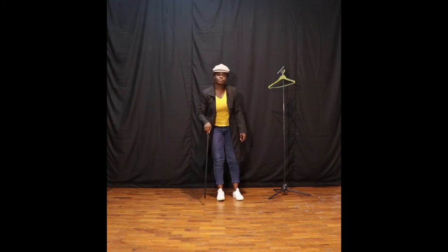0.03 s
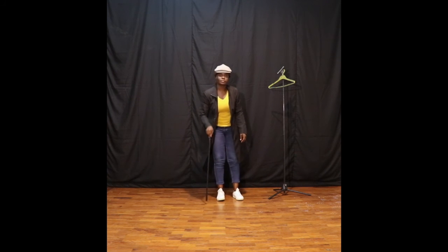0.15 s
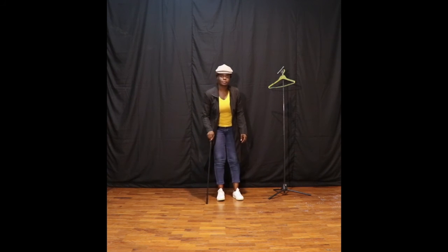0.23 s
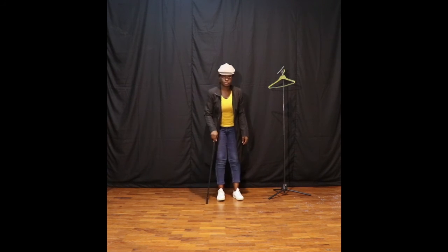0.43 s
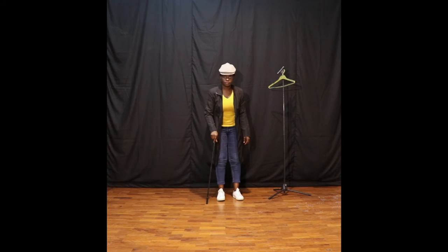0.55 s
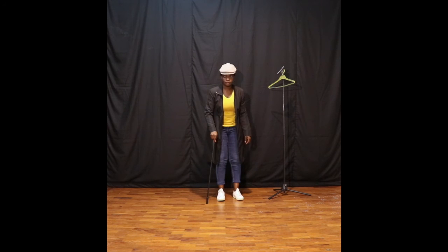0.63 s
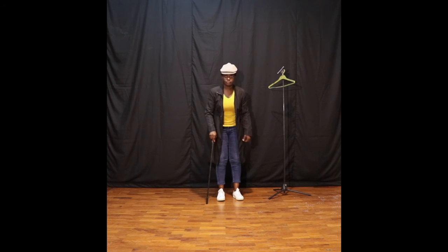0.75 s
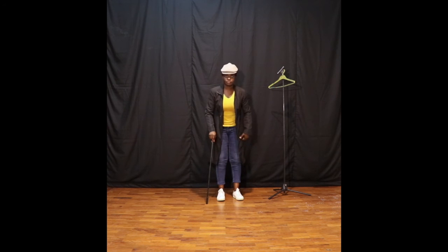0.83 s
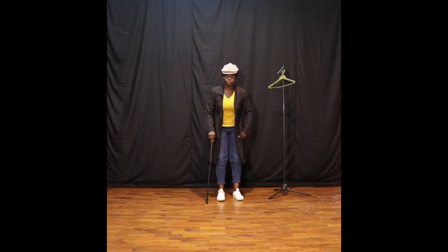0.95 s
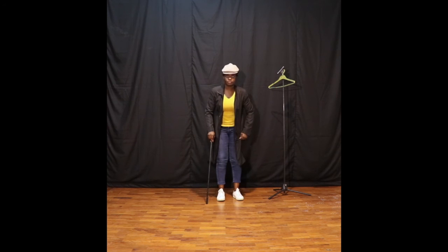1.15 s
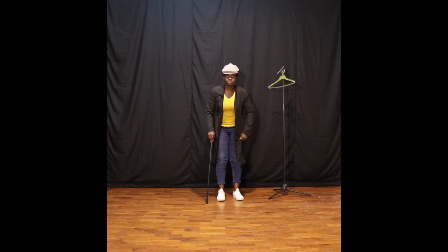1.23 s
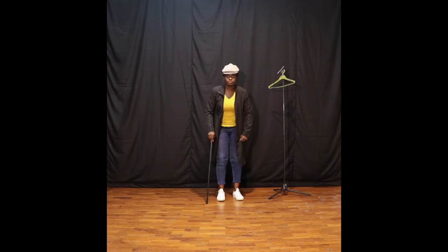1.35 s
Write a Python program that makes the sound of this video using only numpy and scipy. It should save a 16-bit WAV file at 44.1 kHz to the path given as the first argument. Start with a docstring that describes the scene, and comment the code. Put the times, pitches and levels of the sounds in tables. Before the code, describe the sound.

A walking cane knocks once, sharp and loud, on a wooden stage in a small, live hall.

```python
"""Ventilation hums under a small, live hall: coloured air noise and two wavering hum bands.
A walking cane then knocks once on a wooden stage. Its tip cracks as a double noise burst that just
overloads the microphone; shaft and boards ring as decaying sines over a noise buzz, and the floor booms.
The walls answer with repeats of the crack and a fading noise tail.
Later a coat rustles faintly as grainy noise, and soles scuff softly as its wearer shifts."""
import sys
import numpy as np
from scipy import signal
from scipy.fft import rfft, irfft
from scipy.io import wavfile
from scipy.ndimage import uniform_filter1d

SR = 44100
rng = np.random.default_rng(int(sys.argv[2]) if len(sys.argv) > 2 else 0)


def wav_record(signal):
    """Record a signal, one row per channel, as 16-bit PCM in the file named by sys.argv[1]."""
    frames = np.transpose(np.atleast_2d(signal))
    bounded = np.clip(frames, -1, 1)
    # unit amplitude maps onto the largest positive 16-bit level
    quanta = np.round(bounded * 32767).astype(np.int16)
    wavfile.write(sys.argv[1], SR, quanta)


N = 61739
KNOCK_S = .2213

# colour of hard wood, for crack and buzz: frequency_hz, relative_level_db
CRACK_COLOUR = [(40, -26), (120, -14), (230, -13), (650, -5.5), (1350, -4.5), (2300, 4.5), (3200, -2),
                (4400, -3), (5400, -5.5), (7300, -16), (8600, -14.5), (10500, -21), (12000, -18),
                (15500, -33)]
# broad resonances of the cane in buzz and reverberation: centre_hz, width_hz, boost_db
CANE_RESONANCES = [(3180, 250, 6.5), (4008, 77, 9.5), (4820, 110, 8.5), (5860, 250, 6), (6824, 270, 12.5),
                   (7860, 190, 9), (8590, 210, 8.5), (11800, 600, 4.5)]
# stereo width of buzz and hall tail: frequency_hz, side_minus_mid_db
HALL_WIDTH = [(40, -22), (130, -12), (320, -12), (700, -15.5), (1500, -22), (3000, -28), (5000, -48),
              (9000, -47)]
# stereo width of the quiet background: frequency_hz, side_minus_mid_db
QUIET_WIDTH = [(40, -22), (130, -10.5), (320, -13.5), (700, -14.5), (1500, -24), (2500, -30), (4500, -36)]


def amp(db):
    """Decibels to gain."""
    return 10 ** (np.asarray(db) / 20)


def unit(x):
    """Scales to rms 1."""
    return x / np.sqrt(np.mean(x ** 2) + 1e-20)


def read(points, hz):
    """Reads a table on a log-frequency axis."""
    f, value = np.transpose(points)
    return np.interp(np.log(hz + 1), np.log(f + 1), value)


def since(s):
    """Seconds since a moment, zero before it."""
    return np.maximum(np.arange(N) / SR - s, 0)


def strike(t, rise, t60):
    """Quick rise (time constant in s) and exponential decay (t60 in s)."""
    return (1 - np.exp(-t / rise)) * amp(-60 * t / t60)


def swell(s, length, db):
    """A bell-shaped rise and fall around a moment; length is its standard deviation in s."""
    return amp(db) * np.exp(-.5 * ((since(0) - s) / length) ** 2)


def drift(rate_hz):
    """Random motion of rms 1, smoothed by a Gaussian low-pass."""
    hz = np.fft.rfftfreq(N, 1 / SR)
    smooth = np.exp(-(hz / rate_hz) ** 2)
    return unit(irfft(rfft(rng.standard_normal(N)) * smooth, N))


def noise(colour, stereo, resonances=()):
    """Stereo noise of rms 1 with a given colour, width and resonances."""
    hz = np.fft.rfftfreq(N, 1 / SR)
    mid, side = rfft(rng.standard_normal((2, N)))
    side = side * amp(read(stereo, hz))
    level_db = read(colour, hz)
    for centre, width, boost_db in resonances:
        level_db = level_db + boost_db / (1 + (2 * (hz - centre) / width) ** 2)
    return unit(irfft(np.array([mid + side, mid - side]) * amp(level_db), N))


def ventilation():
    """Steady air noise, swelling slightly, and hum bands broadened by random wavering."""
    # frequency_hz, relative_level_db
    air_colour = [(20, -32), (40, -10), (58, 9.5), (76, -4.5), (120, 3.5), (190, 0), (300, -3), (450, -10),
                  (1200, -12.5), (2300, -19), (3800, -21.5), (6000, -31.5), (11000, -35.5), (15500, -38.5)]
    # pitch_hz, waver_rate_hz, level_db
    hums = [(190.2, 14.2, -48), (58, 8, -58)]
    air_db, air_swell_db = -46, -0.28
    t = since(0)
    out = amp(air_db + air_swell_db * drift(rate_hz=4.7)) * noise(air_colour, QUIET_WIDTH)
    for hz, waver_hz, db in hums:
        # a complex waver moves both level and phase
        waver = 0.27 + .5 * drift(waver_hz) + .5j * drift(waver_hz)
        carrier = np.exp(2j * np.pi * (hz * t + rng.random()))
        out += amp(db) * unit((waver * carrier).real)
    return out


def shifting():
    """Grainy cloth rustle as the coat moves, and a dull scuff of soles with a faint tone in it."""
    # coat rustles: centre_s, length_s, level_db
    rustles = [(0.97, .055, -59.5), (1.156, 0.17, -63.5), (1.352, 0.062, -62.5)]
    # one soft scuff as the weight shifts: centre_s, length_s, level_db
    scuff = (1.236, .16, -47)
    # colours of cloth and soles: frequency_hz, relative_level_db
    cloth_colour = [(200, -14), (600, 1), (2000, 5.5), (5000, -2.5), (10000, -4), (15500, -12)]
    sole_colour = [(80, -41), (190, 24.5), (250, -23), (310, 5), (460, -9.5), (580, 5), (720, -9),
                   (1700, -3), (2400, -20), (3600, -9.5), (6000, -35), (12000, -43)]
    grain_db, tone_hz = 1, 576
    grain = amp(grain_db * drift(rate_hz=230))
    cloth = unit(noise(cloth_colour, QUIET_WIDTH) * grain)
    rustle = cloth * sum(swell(*row) for row in rustles)
    soles = noise(sole_colour, QUIET_WIDTH) * swell(*scuff)
    # random phase motion blurs the tone
    tone = unit(np.sin(2 * np.pi * tone_hz * since(0) + 1.3 * drift(rate_hz=10)))
    return rustle + soles + tone * swell(s=1.238, length=0.063, db=-56.5)


def hall():
    """Early echoes from walls and ceiling, and a diffuse tail whose treble dies first."""
    # delay_s, level_below_crack_db
    echoes = [(.0089, -3), (0.0134, -9.5), (0.0188, -16), (0.0253, -13.5), (0.0333, -13.5), (.048, -17)]
    # colour of the tail: frequency_hz, relative_level_db
    hall_colour = [(40, -42), (90, -8), (160, -5), (260, 0), (420, -4), (600, -4), (950, -5), (1500, -7.5),
                   (2150, -1), (2750, -11.5), (3400, -7.5), (4500, -10), (5400, -11.5), (6400, -20.5),
                   (7400, -19.5), (10500, -19.5), (12300, -21), (15500, -32)]
    # frequency_hz, t60_s
    hall_decay = [(100, 0.93), (500, 0.78), (2000, 0.78), (4500, 0.75), (8000, 0.59), (14000, .4)]
    tail_db, tail_rise_s = -16, 0.0026
    early = sum(amp(db) * crack(KNOCK_S + delay) for delay, db in echoes)
    source = noise(hall_colour, HALL_WIDTH, CANE_RESONANCES)
    hz, t, z = signal.stft(source, SR, nperseg=512)
    # each frequency band fades at its own rate
    fade = amp(-60 * np.maximum(t - KNOCK_S, 0) / read(hall_decay, hz)[:, None])
    tail = signal.istft(z * fade, SR, nperseg=512)[1][:, :N]
    onset = 1 - np.exp(-since(KNOCK_S) / tail_rise_s)
    return early + amp(tail_db) * tail * onset


def boom():
    """Low modes of the hollow stage floor, decaying sines that build up in the hall."""
    # pitch_hz, level_db, t60_s, delay_s, rise_s
    floor_modes = [(83.76, -29, 0.98, 0.0288, 0.077), (118.5, -33, 0.35, .001, 0.0096),
                   (234.5, -21, 0.39, 0.000074, .001), (217.9, -19.5, 0.56, .062, 0.01)]
    out = np.zeros((2, N))
    for hz, db, t60, delay, rise in floor_modes:
        t = since(KNOCK_S + delay)
        phase = np.array([[.2], [-.2]])  # left and right, radians
        out += amp(db) * strike(t, rise, t60) * np.sin(2 * np.pi * hz * t + phase)
    return out


def ring():
    """Wavering, decaying modes of shaft and boards, with a short noise buzz of the wood around the tip."""
    # pitch_hz, relative_level_db, t60_s
    modes = [(604, -25, .44), (725, -34, .55), (831, -30, .5), (849, -31, .52), (1060, -26, .48),
             (1210, -29, .6), (1227, -31, .65), (1298, -33, .5), (1820, -27, .52), (1885, -27, .46),
             (2037, -28, .46), (2116, -23, .4), (2290, -25, .4), (2415, -27, .4), (2463, -22, .4),
             (2870, -31, .45), (3130, -26, .46), (3222, -31, .5), (5922, -35, .52)]
    ring_db, ring_rise_s, waver_depth = 3, 0.0011, 0.16
    buzz_db, buzz_rise_s, buzz_t60_s = -11, 0.0075, .12
    t = since(KNOCK_S)
    buzz = noise(CRACK_COLOUR, HALL_WIDTH, CANE_RESONANCES)
    out = amp(buzz_db) * buzz * strike(t, buzz_rise_s, buzz_t60_s)
    for hz, db, t60 in modes:
        # a small phase offset per channel gives width
        phase = rng.uniform(0, 2 * np.pi) + 0.26 * rng.standard_normal((2, 1))
        waver = 1 + waver_depth * (drift(rate_hz=18) + 1j * drift(rate_hz=18))
        tone = (waver * np.exp(1j * (2 * np.pi * hz * t + phase))).real
        out += amp(ring_db + db) * strike(t, ring_rise_s, t60) * tone
    return out


def crack(s):
    """The tip bites twice within two milliseconds: a dense, very short burst coloured by hard wood."""
    # contacts: time_after_touch_s, relative_level_db, decay_time_constant_s
    contacts = [(.0003, -1.5, .0013), (.0016, 2.5, 0.0011)]
    crack_db, side_db, rise_s = -1, -17.5, 0.00028
    hz = np.fft.rfftfreq(N, 1 / SR)
    shape = np.zeros(N)
    for late, db, decay in contacts:
        t = since(s + late)
        shape += amp(db) * (1 - np.exp(-t / rise_s)) * np.exp(-t / decay)
    burst = rfft(rng.standard_normal((2, N)) * shape)
    # flatten the broad spectrum of the random burst before colouring it
    even = burst / np.sqrt(uniform_filter1d(abs(burst) ** 2, size=400, axis=1) + 1e-12)
    # silence ahead of the first contact
    mid, side = irfft(even * amp(read(CRACK_COLOUR, hz)), N) * (shape > 0)
    side = side * amp(side_db)
    strength = np.sqrt(np.mean(shape ** 2))
    return amp(crack_db) * strength * unit(np.array([mid + side, mid - side]))


def scene():
    """The knock in its hall, over the quiet room."""
    background = ventilation() + shifting()
    return background + hall() + boom() + ring() + crack(KNOCK_S)


def record(dry):
    """The microphone clips the loudest peaks; a low-pass then limits the band."""
    edge_hz = 15800
    clipped = np.clip(dry, -1, 1)
    low_pass = signal.firwin(255, edge_hz, window=("kaiser", 8), fs=SR)
    return signal.oaconvolve(clipped, low_pass[None], "same")


dry = scene()
out = record(dry)
wav_record(out)
```